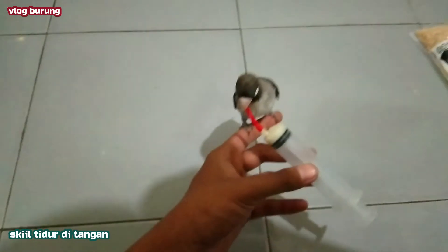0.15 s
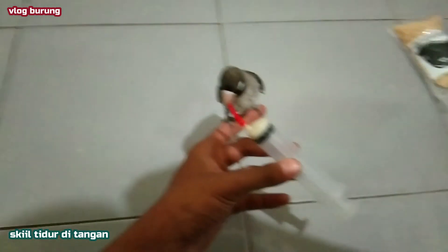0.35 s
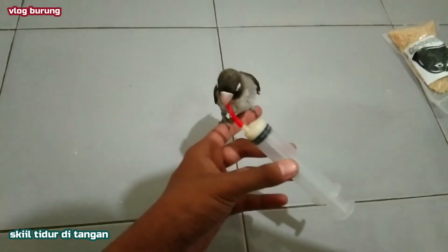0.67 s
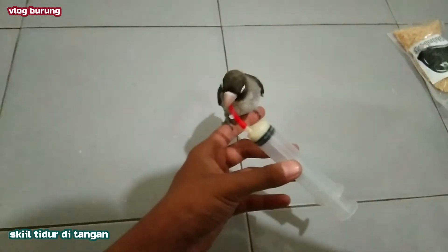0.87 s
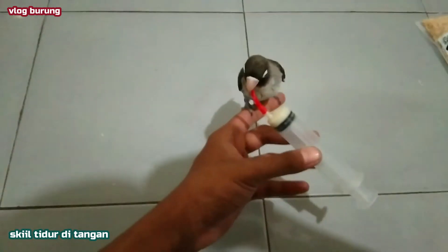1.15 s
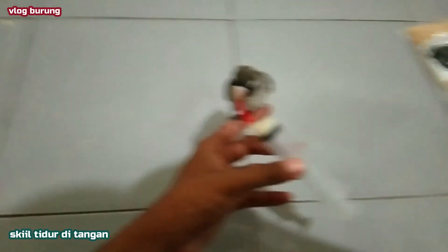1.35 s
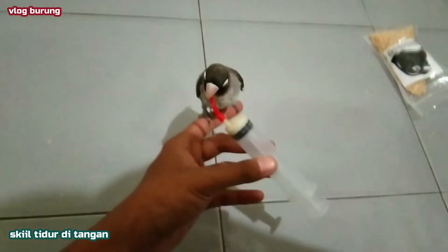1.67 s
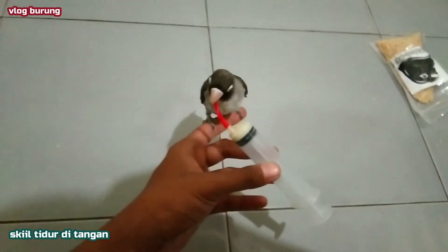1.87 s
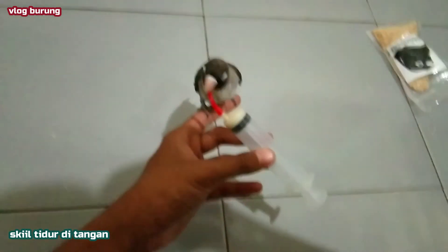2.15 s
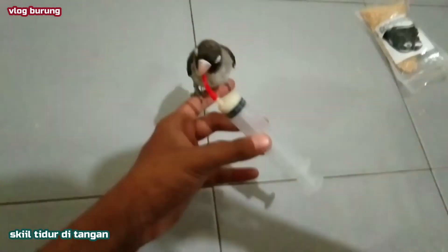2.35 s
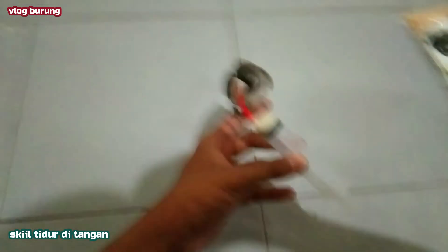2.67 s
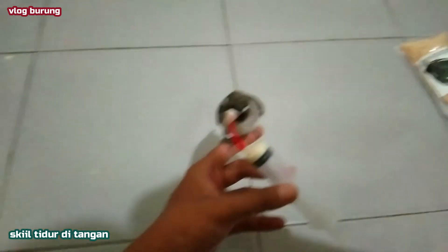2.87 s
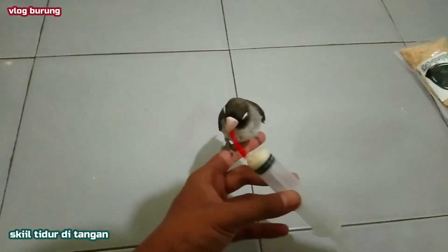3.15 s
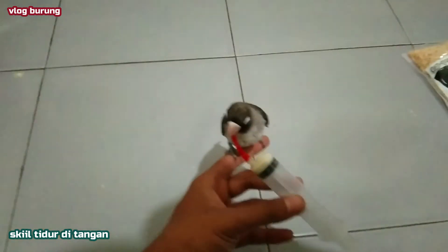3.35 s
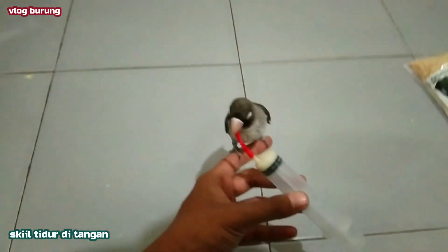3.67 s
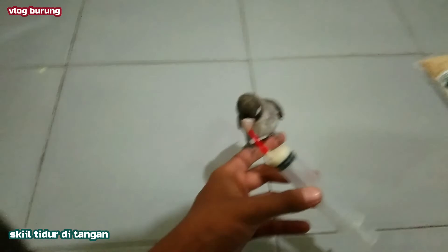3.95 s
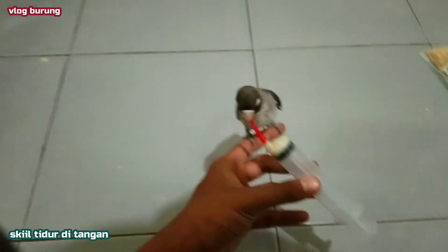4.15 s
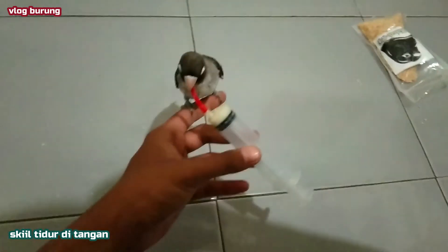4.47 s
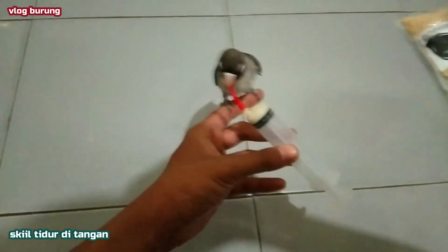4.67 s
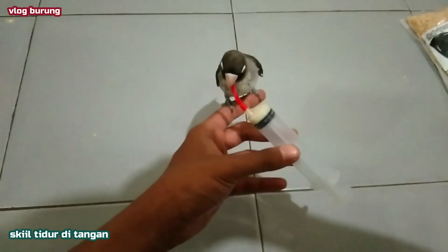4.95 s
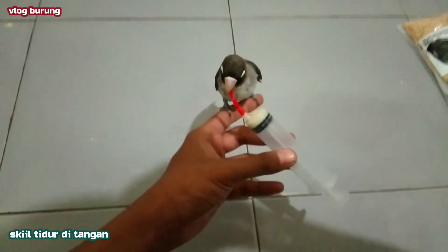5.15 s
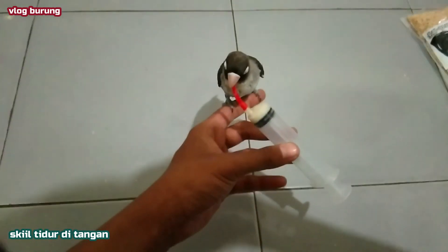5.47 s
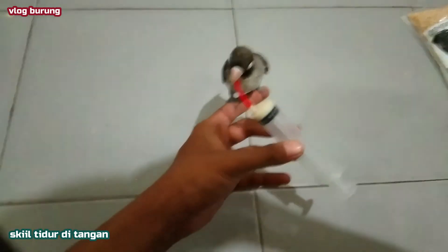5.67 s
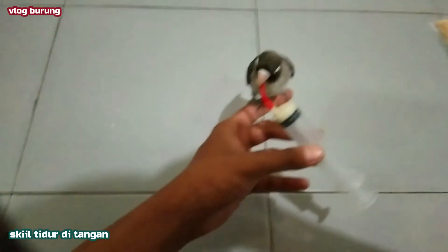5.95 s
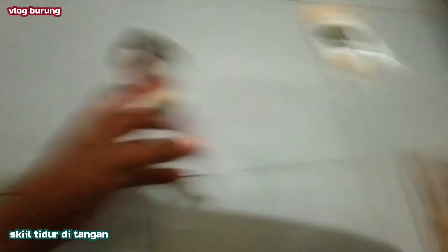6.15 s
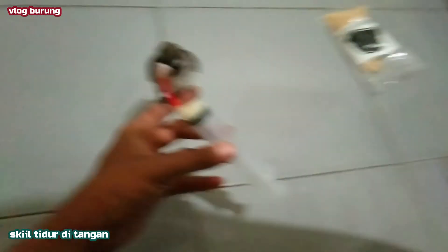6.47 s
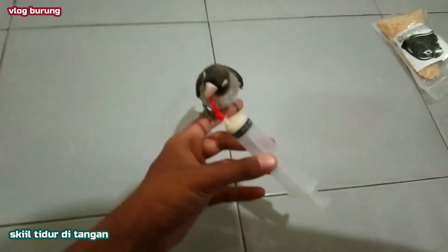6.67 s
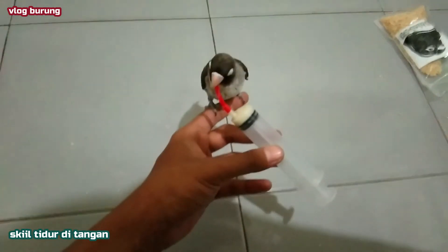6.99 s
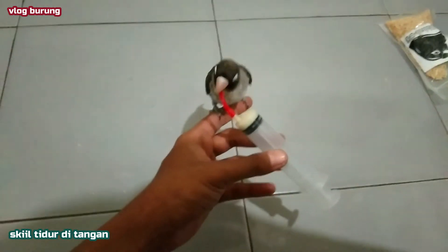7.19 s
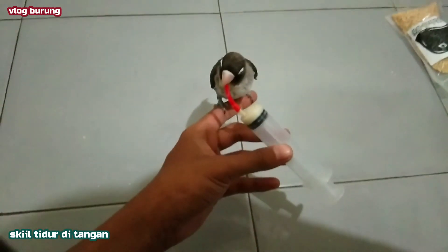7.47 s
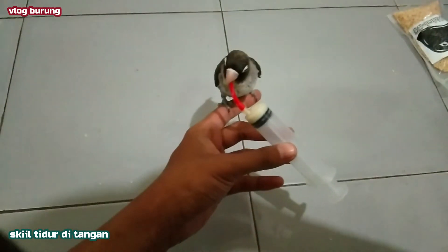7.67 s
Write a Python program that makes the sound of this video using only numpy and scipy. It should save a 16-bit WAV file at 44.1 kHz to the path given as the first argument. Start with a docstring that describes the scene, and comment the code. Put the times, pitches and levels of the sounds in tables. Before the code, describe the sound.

A handheld phone is handled throughout about eight seconds in a tiled room with a faint hush. Irregular knocks, ticks, light rubs and a low grip rumble sound right at the microphone. Further off, softer and slightly echoing, a small bird gives two hoarse, high, falling chirps at 0.5 and 0.7 seconds, around a sharp knock. Skin slides loudly over the case at 1 second, and more knocks follow. The bird chirps four times from 2.8 seconds, a brief distant raspy squeak comes at 3.6, and two more chirps follow near 3.9. Hard knocks cluster at 4 and 4.9 seconds. Three chirps start at 5.3, then a second loud slide comes at 5.7, with knocks around 5.9, 6.2 and 7. From 7.3 seconds the palm thuds softly against the case while the bird gives four last chirps.

```python
"""A phone is held in one hand while a small bird is fed in a tiled room. From the start, shifting
fingers make the case knock and creak. Further off the bird gives two falling chirps, smeared by the
hard walls, and at 1 s skin slides loudly over the case. Short runs of chirps follow from 2.8 s, with
one raspy squeak across the room at 3.6 s. Another loud slide comes at 5.7 s, and after 7 s the palm
thuds softly against the case while the bird calls once more."""
import sys
import numpy as np
from scipy import signal
from scipy.fft import rfft, irfft
from scipy.io import wavfile
from scipy.ndimage import uniform_filter1d

SR = 44100
rng = np.random.default_rng(int(sys.argv[2]) if len(sys.argv) > 2 else 0)


def store_pcm(level_fs):
    """Save levels as 16-bit WAV."""
    pcm = np.round(np.clip(level_fs, -1, 1) * 32767).astype(np.int16)
    wavfile.write(sys.argv[1], SR, np.atleast_2d(pcm).T)


N = 344862

# Knocks on the case. Each row: start in seconds, thump level in dB, hardness (crack over thump) in dB.
KNOCKS = [(0.0556, -33.5, -6), (0.077, -43, 2.5), (0.142, -31.0, -12.5), (0.1675, -31.5, -16),
          (0.2281, -17.0, -18.5), (0.6138, -26.5, -17), (0.6384, -10.5, -7), (0.7815, -39.5, -12),
          (0.9267, -39, 1.5), (0.9777, -24.5, -5.5), (1.163, -21.0, 5.5), (1.173, -23, -12.5),
          (1.2765, -17, -8.5), (1.344, -30, -0.5), (1.402, -31.5, -26), (1.4807, -34, -2.0),
          (1.553, -33.0, -7.5), (1.6746, -26, -26), (1.6931, -13, -4), (1.7528, -16.0, -15.5),
          (1.988, -32.5, -16), (2.0239, -28, -18), (2.0839, -16, -31), (2.1621, -30.5, -19.5),
          (2.2829, -24.5, -4), (2.3078, -17.5, -9), (2.3989, -26.5, -26), (2.4187, -29.5, -17),
          (2.476, -23.5, -6), (2.5933, -27.5, -14), (2.6485, -19.0, -37), (2.67, -25.5, -7),
          (2.7281, -43.5, 6.5), (2.973, -38, -14), (3.044, -35.5, -5), (3.194, -37.5, -4),
          (3.226, -32.5, -7), (3.3247, -36.5, -13), (3.4183, -31, -10), (3.5146, -33.5, -11),
          (3.703, -45, 7.5), (3.84, -28.5, -9.5), (3.8991, -38, 4.5), (3.9426, -28, -10.5),
          (3.9753, -28.5, -10), (4.018, -19.5, -14), (4.0345, -14, -1.5), (4.0461, -14, -8),
          (4.195, -33, -22), (4.269, -27.5, -16), (4.504, -31.0, -23), (4.559, -24.5, -15.5),
          (4.7379, -19.5, -19.5), (4.8384, -31.5, -38), (4.8854, -31, -13.5), (4.9055, -18, 3),
          (4.9201, -20.5, -6), (4.931, -16.5, -5.5), (4.9464, -21, -8), (5.086, -40.5, -17.0),
          (5.1921, -35, -12), (5.298, -40, -21), (5.364, -30, -15.5), (5.4386, -33.5, 0.5),
          (5.4643, -21, -13), (5.6922, -15.5, -14), (5.8526, -17.5, -12), (5.874, -11.5, -17.5),
          (6.0939, -18, -32), (6.173, -17, -30), (6.1979, -17.5, -6), (6.205, -14, -16),
          (6.2392, -17.5, -7.5), (6.378, -28.5, -8.5), (6.47, -29, -41), (6.5267, -24.5, -7.0),
          (6.5836, -21, -28), (6.64, -29.5, -6), (6.7621, -32.5, -6.5), (6.8206, -38.5, -10),
          (7.0423, -11, -12.5), (7.0576, -19, 3), (7.0641, -14, -2.0), (7.1168, -18, -14),
          (7.2366, -27, -6), (7.288, -30, -20), (7.329, -14.5, -17), (7.3769, -40, -1.5),
          (7.4412, -27.5, -21), (7.5047, -26.0, -15.5), (7.5913, -25.0, -9.5), (7.605, -31, -14),
          (7.7382, -22.5, -39)]
# The low and high notes of the case. Each row: pitch in Hz, seconds to fade by 60 dB, level in dB.
THUMP_NOTES = [(129, 0.045, -25.5), (187, 0.045, -12), (276.8, 0.083, -4), (332.5, 0.09, -5),
               (422.3, 0.076, -6), (571, 0.044, -6)]
RING_NOTES = [(766, 0.019, -2.5), (915, 0.041, 1), (1051, 0.047, 1), (1365, 0.038, -0.5),
              (1603, 0.036, -6.5), (1888, 0.055, -7.5), (2136, 0.037, -11)]
# Movements of the hand. Each row: start in seconds, length in seconds, strength in dB.
SKIN_STROKES = [(0, 0.044, -27), (0.106, 0.15, -39), (0.317, 0.16, -37.5), (0.712, 0.36, -43),
                (0.964, 0.17, -12.5), (1.235, 0.16, -27.5), (1.313, 0.24, -39.5), (1.614, 0.11, -37.5),
                (1.923, 0.076, -38.5), (2.025, 0.11, -34.5), (2.169, 0.17, -30), (2.332, 0.067, -27.5),
                (2.386, 0.14, -30), (2.582, 0.14, -32), (2.658, 0.128, -42), (2.986, 0.13, -45),
                (3.208, 0.09, -41), (3.812, 0.12, -43), (3.926, 0.16, -31.5), (4.055, 0.21, -43),
                (4.248, 0.24, -38), (4.519, 0.24, -42.5), (5.091, 0.13, -44.5), (5.451, 0.061, -25),
                (5.498, 0.2, -45.5), (5.692, 0.16, -11), (5.935, 0.18, -26.5), (6.059, 0.25, -34.0),
                (6.35, 0.42, -40.5), (6.882, 0.15, -42), (7.022, 0.36, -42.5), (7.325, 0.26, -43.5)]  # skin slides over the case
GRIP_SHIFTS = [(0, 0.18, -36.5), (1.26, 0.35, -42), (2.18, 0.57, -39), (2.59, 0.17, -33), (3.74, 0.24, -38),
               (4.3, 0.13, -38), (4.86, 0.057, -33.5), (5.16, 0.11, -37), (5.97, 0.16, -37.5),
               (6.18, 0.12, -22.5), (6.5, 0.43, -41.5), (7.2, 0.26, -39)]  # the holding hand tightens or shifts
# Soft pushes of the palm. Each row: start in seconds, level in dB.
PALM_PUSHES = [(.225, -36), (3.836, -33), (3.972, -36), (5.689, -22.5), (5.871, -33), (6.171, -38),
               (7.285, -31), (7.325, -26), (7.375, -30), (7.436, -28), (7.501, -23.5), (7.581, -22),
               (7.737, -27)]
# Chirps. Each row: start in seconds, length in seconds, fall of a full sweep in octaves, level in dB.
CHIRPS = [(0.515, .076, 0.83, -33), (0.721, .066, 1.2, -41.5), (2.78, 0.079, 0.99, -37),
          (2.879, 0.076, 1, -36), (2.991, 0.067, 0.89, -35), (3.109, 0.076, 0.45, -39.5),
          (3.826, 0.083, 1.1, -34.5), (3.948, .065, 0.52, -37), (5.305, 0.083, 0.97, -37.5),
          (5.417, 0.082, 0.58, -35.5), (5.521, 0.093, .65, -34), (7.336, 0.079, 0.73, -37),
          (7.426, 0.077, .75, -35), (7.548, 0.08, 0.55, -37), (7.665, 0.041, 0.97, -41.5)]
# The squeak. Its one row: start in seconds, length in seconds, pitch in Hz, level in dB.
SQUEAK = (3.612, .04, 1550, -37)
# Tone curves, which make a sound dull or bright. Each row: frequency in Hz, boost or cut in dB.
CRACK_TONE = [(700, -8.5), (1900, 0), (3000, 7), (3800, 5.5), (4600, -1), (6000, 1.5), (7200, -0.5),
              (8800, -18.5), (12000, -36), (16000, -47)]  # the sharp start of a knock
LIGHT_SKIN_TONE = [(60, -19), (300, 3), (700, 6.5), (1300, 1), (2300, -2.5), (4500, -1), (6000, 0.5),
                   (7200, 1.5), (8700, -13), (12000, -29), (16000, -26)]  # skin brushing the case
PRESSED_SKIN_TONE = [(30, -50), (90, -3), (400, -3.5), (700, -3.5), (1300, -2), (2800, -2), (5300, -3),
                     (6800, -4.5), (8000, -16.5), (9200, -23), (12000, -35.5), (16000, -38)]  # skin pressed on the case
GRIP_TONE = [(30, -22), (60, -34), (100, -4), (190, -5.5), (320, 7), (470, -3), (700, -10.5), (1050, -10),
             (1500, -21), (2400, -24.5), (6000, -56.5)]  # the grip heard through the case
BEAK_TONE = [(1500, -10), (2300, 2), (2750, 0), (3150, 1), (3600, -3), (4200, -1), (5000, -10), (9000, -14)]  # the bird's throat and beak
AIR_TONE = [(30, -18), (90, 15), (310, 2), (550, 1), (1100, -16), (2000, -3.5), (7000, -10.5), (9000, -38),
            (12000, -50), (16000, -51)]  # the background hush


def case_knocks(snap_fade_s=0.014, chatter_fade_s=0.065, chatter_db=-15):
    """Each release snaps, chatters briefly and rings the case; the harder the contact, the brighter."""
    out, t = np.zeros(N), np.arange(SR // 8) / SR
    fade = undb(-60 * t / snap_fade_s) + undb(chatter_db - 60 * t / chatter_fade_s)
    for start, db, hardness_db in KNOCKS + faint_ticks():
        crack = colour(rng.standard_normal(len(t)) * fade, CRACK_TONE)
        thump = case_ring(THUMP_NOTES, t, detune=0.069, scatter_db=4.5, finger_fade_s=0.86)
        ring = case_ring(RING_NOTES, t, detune=0.05, scatter_db=4.0, finger_fade_s=0.2)
        ring_db = db + 1.9 + 0.47 * hardness_db  # harder contact rings the high notes more
        add(out, start, hit_at_level(thump, db))
        add(out, start, hit_at_level(ring, ring_db))
        add(out, start, hit_at_level(crack, db + hardness_db))
    return out


def case_ring(notes, t, detune, scatter_db, finger_fade_s):
    """Each touch presses a different spot, which shifts the case's notes and makes them fade sooner."""
    hz, fade_s, db = np.transpose(notes)[:, :, None]
    tune, size = rng.standard_normal((2, len(notes), 1))
    sign = rng.choice([-1, 1], (len(notes), 1))
    loudness = undb(db + scatter_db * size - 60 * t / fade_s - 60 * t / finger_fade_s)
    waves = np.sin(2 * np.pi * hz * (1 + detune * tune) * t)
    return np.sum(sign * loudness * waves, axis=0)


def faint_ticks(per_second=11, level_db=-45, hardness_db=-15):
    """The case also ticks faintly at random moments. Gives rows like those of KNOCKS."""
    slots = np.arange(0, N / SR, 1 / per_second)
    late, size, hard = rng.standard_normal((len(slots), 3)).T
    starts = np.abs(slots + late / per_second / 2)
    return list(zip(starts, level_db + 3 * size, hardness_db + 6 * hard))


def skin_slide(pressed_from_db=-42, pressed_range_db=20, uneven_db=1.73):
    """Skin hisses thinly as it brushes the case; pressed harder, its slips are denser and fuller."""
    power = hand_effort(SKIN_STROKES, rest_db=-54.5)
    level_db = 10 * np.log10(power) + uneven_db * wander(per_second=130)
    pressure = np.clip((level_db - pressed_from_db) / pressed_range_db, 0, 1)
    light = unit(colour(slips(per_second=7000, spread_db=-0.5), LIGHT_SKIN_TONE)) * undb(1)
    pressed = unit(colour(slips(per_second=30000, spread_db=1.3), PRESSED_SKIN_TONE)) * undb(3)
    return undb(level_db) * (np.sqrt(1 - pressure) * light + np.sqrt(pressure) * pressed)


def grip_rumble(boost_db=5.0, uneven_db=2.5, creep_db=-21, build_s=0.0075, settle_s=0.04):
    """Soft, uneven slips of the holding hand rumble through the case."""
    power = hand_effort(GRIP_SHIFTS, rest_db=-56)
    t = np.arange(-SR // 4, SR // 4) / SR
    strain = np.exp(np.minimum(t / build_s, -t / settle_s))
    for start, db, _ in KNOCKS:  # the grip creeps at each knock and settles after it
        creep = undb(db + creep_db) * strain[t >= -start]
        add(power, start + t[0], creep ** 2)
    rumble = unit(colour(slips(per_second=500, spread_db=2), GRIP_TONE))
    return rumble * np.sqrt(power) * undb(boost_db + uneven_db * wander(per_second=23))


def hand_effort(moves, rest_db, restless_db=4.5, swell_share=0.42, tire_db=4):
    """Each movement gathers speed, tires a little and stops; the hand never rests entirely."""
    power = undb(rest_db + restless_db * wander(per_second=11)) ** 2
    for start, length, db in moves:
        t = np.arange(int(length * SR)) / SR
        swell = np.minimum(t / (swell_share * length), 1) ** 1.05
        stop_s = 0.029 * 2 ** ((-11.5 - db) / 17.5)  # firm movements stop short, soft ones trail off
        stop = np.minimum((length - t) / stop_s, 1)
        add(power, start, (swell * stop * undb(db - tire_db * t / length)) ** 2)
    return power


def palm_thuds(hz=112, length_s=0.033):
    """Flesh gives way slowly, so each push is just a few low, uneven waves."""
    out, progress = np.zeros(N), np.linspace(0, 1, int(length_s * SR))
    swell = np.sqrt(progress) * (1 - progress) ** 2
    for start, db in PALM_PUSHES:
        tune, size, phase = rng.standard_normal(3)
        angle = 2 * np.pi * hz * (1 + 0.22 * tune) * progress * length_s
        push = np.sin(angle) + 0.62 * size * np.sin(0.78 * angle + phase)
        add(out, start, hit_at_level(push * swell, db))
    return out


def bird_chirps(halfway_hz=3040, full_sweep_s=0.082, overtone_db=-8):
    """Each chirp is a hoarse, falling whistle, shaped by the bird's throat and beak."""
    out = np.zeros(N)
    wobble = 1 + 0.033 * wander(per_second=800)
    flutter = undb(3.2 * wander(per_second=160))
    for start, length, octaves, db in CHIRPS:
        progress = np.linspace(0, 1, int(length * SR))
        span = slice(int(start * SR), int(start * SR) + len(progress))
        sweep = progress * length / full_sweep_s  # short chirps break off early
        fall = sweep + 0.163 * np.sin(2 * np.pi * sweep) / (2 * np.pi)  # slows a little halfway
        hz = halfway_hz * 2 ** (octaves * (0.5 - fall)) * wobble[span]
        phase = 2 * np.pi * np.cumsum(hz) / SR
        whistle = np.sin(phase) + undb(overtone_db) * np.sin(2 * phase)
        swell = 2 * np.sqrt(progress * (1 - progress)) * flutter[span]
        add(out, start, undb(db) * swell * whistle)
    return colour(out, BEAK_TONE)


def squeak():
    """Irregular slips make one short rasp, strongest around one pitch."""
    start, length, hz, db = SQUEAK
    out, swell = np.zeros(N), np.hanning(int(length * SR))
    tone = [(hz / 2, -25), (hz, 0), (1.4 * hz, -7), (2 * hz, -25), (10 * hz, -50)]
    rasp = unit(colour(slips(per_second=2000, spread_db=1.5), tone))
    add(out, start, undb(db) * swell * rasp[:len(swell)])
    return out


def first_echoes(x, count=10, within_s=0.02):
    """The floor and nearest walls quickly bounce a distant sound back several times."""
    echoes = np.zeros(int(within_s * SR))
    echoes[rng.integers(0, len(echoes), count)] = rng.choice([-1, 1], count) * np.sqrt(1 / count)
    return signal.fftconvolve(x, echoes)[:N]


def room_echo(x, treble_db, gap_s=0.0072, fade_s=0.31):
    """Countless echoes from tiles and walls blur into one fading tail."""
    t = np.arange(SR * 3 // 4) / SR
    tail = rng.standard_normal(len(t)) * undb(-60 * t / fade_s) * (t > gap_s)
    echo = signal.fftconvolve(x, tail / np.sqrt(np.sum(tail ** 2)))[:N]
    return colour(echo, [(100, -27), (500, -12), (1300, 2.5), (3000, treble_db), (9000, 2 * treble_db)])


def room_air(level_db=-55.5):
    """A faint hush whose level drifts a little."""
    hush = unit(colour(rng.standard_normal(N), AIR_TONE))
    return hush * undb(level_db + wander(per_second=3.72))


def slips(per_second, spread_db):
    """Rubbing surfaces stick and let go, making tiny clicks of random size at random moments."""
    size = undb(spread_db * np.minimum(rng.exponential(size=N), 4))
    lets_go = rng.random(N) < per_second / SR
    return unit(lets_go * size * rng.standard_normal(N))


def wander(per_second):
    """A smooth random drift with a typical size of 1."""
    step = max(int(SR / per_second), 2)
    stairs = np.repeat(rng.standard_normal(N // step + 1), step)[:N]
    return unit(uniform_filter1d(stairs, step))


def colour(x, tone, size=2048):
    """Boost and cut the frequencies of x along a tone curve."""
    hz, db = np.transpose(tone)
    grid_hz = np.maximum(np.arange(size // 2 + 1) * SR / size, 1)
    gains = undb(np.interp(np.log(grid_hz), np.log(hz), db))
    # Fold the filter's second half onto its first, so it rings only after a sound, never before.
    folded = irfft(np.log(gains))
    folded[1:size // 2] *= 2
    folded[size // 2 + 1:] = 0
    click_response = irfft(np.exp(rfft(folded)))
    return signal.fftconvolve(x, click_response)[:len(x)]


def hit_at_level(x, db):
    """Give a hit the energy of 10 ms of steady sound at this level."""
    return x * undb(db) * np.sqrt(SR / 100 / np.sum(x ** 2))


def add(out, start, x):
    """Mix x into out from a start time in seconds."""
    i = max(int(start * SR), 0)
    out[i:i + len(x)] += x[:max(N - i, 0)]


def undb(db):
    """Turn decibels into a number to multiply by."""
    return 10 ** (np.asarray(db) / 20)


def unit(x):
    """Scale x to an average power of 1."""
    return x / np.sqrt(np.mean(x ** 2))


def scene():
    """The hand and case sound right at the microphone; the bird is heard mostly through the room."""
    distant = bird_chirps() + squeak()
    early = first_echoes(distant) + undb(-2) * distant
    far = undb(-4) * early + undb(-5) * room_echo(early, treble_db=-1)
    air = room_air()
    hand = skin_slide() + grip_rumble() + palm_thuds()
    case = case_knocks()
    near = hand + case + undb(-15.5) * room_echo(case, treble_db=-5)
    return (near + far + air)[None]


def record(dry):
    """The phone thins the deep bass, overloads on the hardest knocks and cuts the highest treble."""
    bass_cut = signal.butter(3, 65, "high", fs=SR, output="sos")
    treble_cut = signal.ellip(8, 0.2, 60, 15700, fs=SR, output="sos")
    clipped = np.clip(signal.sosfilt(bass_cut, dry), -1, 1)
    return signal.sosfilt(treble_cut, clipped)


dry = scene()
out = record(dry)
store_pcm(out)
```